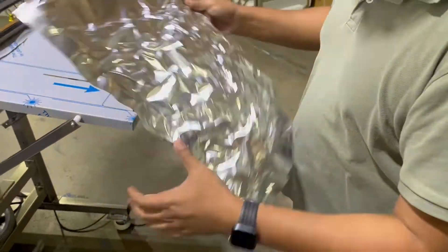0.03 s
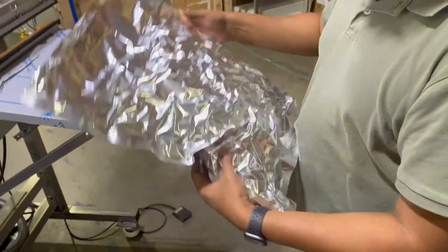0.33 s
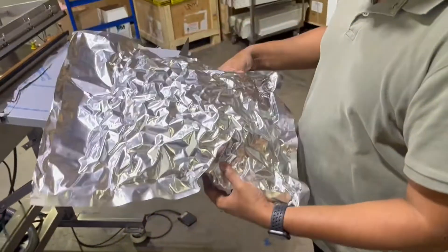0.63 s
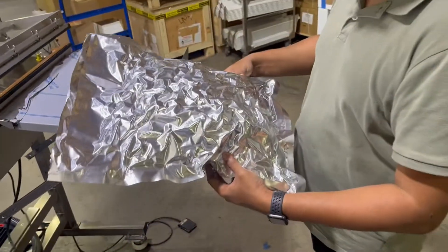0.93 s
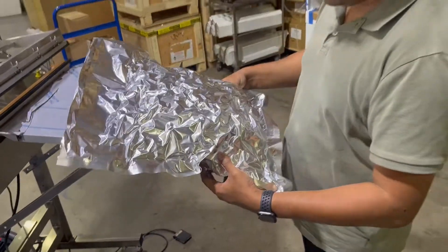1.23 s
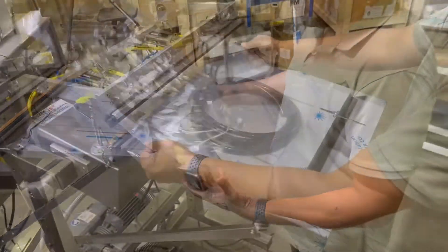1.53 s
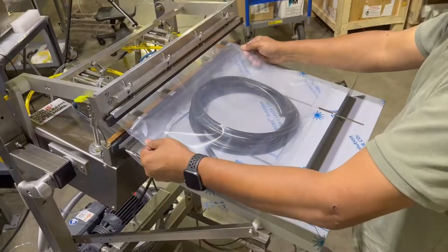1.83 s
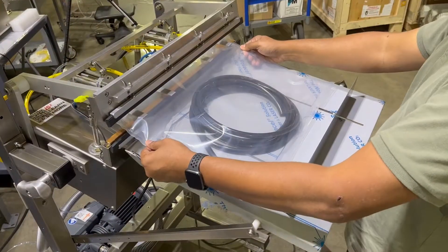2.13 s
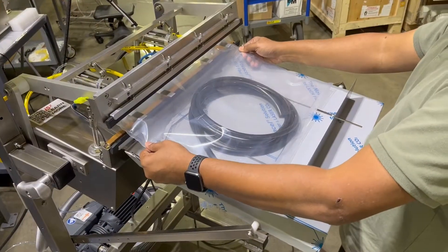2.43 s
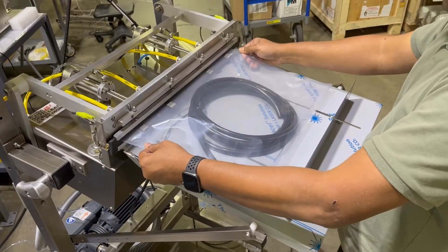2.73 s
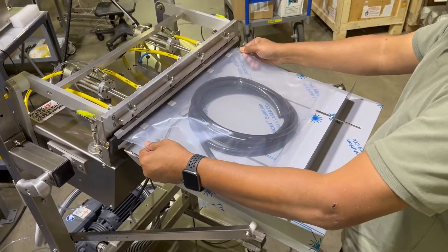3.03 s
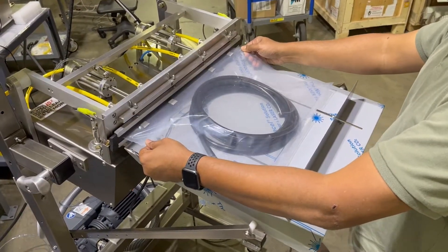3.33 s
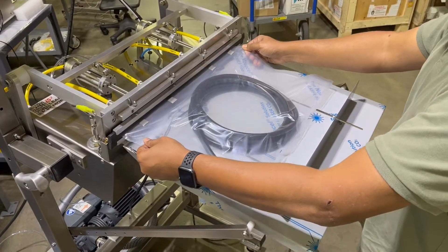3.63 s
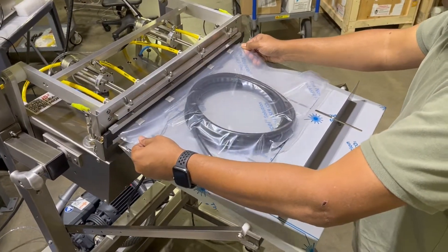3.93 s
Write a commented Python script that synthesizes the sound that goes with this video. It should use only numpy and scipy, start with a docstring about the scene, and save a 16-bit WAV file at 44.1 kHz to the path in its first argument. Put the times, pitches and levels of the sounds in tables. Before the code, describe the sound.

A foil bag crinkles, snaps and flexes close to the microphone, followed by rustling plastic. A vacuum sealer's motor then hums up, air rushes in, the jaw clacks shut and the pump whines over low workshop rumble.

```python
"""Foil bag and vacuum sealer

A crumpled foil bag is handled in a workshop: creases snap, dents pop and the sheet flexes with
falling low tones. A plastic bag is then laid in a vacuum sealer. The motor hums up, air rushes
into the nozzle, the jaw shuts with a clack and the vane pump settles into a whine."""
import sys
import numpy as np
from scipy import signal
from scipy.fft import rfft, irfft, next_fast_len
from scipy.io import wavfile

SR = 44100
rng = np.random.default_rng(int(sys.argv[2]) if len(sys.argv) > 2 else 0)


def wrap_up_sound(samples):
    """Save the sound to the file named by the first command line argument, as 16-bit audio."""
    columns = np.atleast_2d(samples).T
    # keep every value between -1 and 1, then stretch to whole-number steps
    tamed = np.clip(columns, -1, 1)
    steps = np.round(tamed * 32767).astype(np.int16)
    wavfile.write(sys.argv[1], SR, steps)


N = 176400
T = np.arange(N) / SR


def amp(db):
    """Decibels to gain."""
    return 10 ** (np.asarray(db) / 20)


def unit(x):
    """Scales to rms 1."""
    return x / np.sqrt(np.mean(x ** 2) + 1e-20)


def read(points, hz):
    """Reads a curve on a log-frequency axis."""
    freqs, values = np.transpose(points)
    return np.interp(np.log(hz + 1), np.log(freqs + 1), values)


def fader(rows, column=1):
    """Gain from a dB column, silent outside its rows; a curve ending after 3.5 s holds its level."""
    rows = np.array(rows)
    end_db = rows[-1, column] if rows[-1, 0] > 3.5 else -120
    return amp(np.interp(T, rows[:, 0], rows[:, column], left=-120, right=end_db))


def add(mix, start, sound):
    """Mixes a sound in at a start time in seconds."""
    part = mix[..., max(round(start * SR), 0):][..., :sound.shape[-1]]
    part += sound[..., :part.shape[-1]]


def colour(x, eq):
    """Minimum-phase EQ: nothing rings ahead of a transient."""
    size = next_fast_len(x.shape[-1] + 4096)
    log_gain = np.log(amp(read(eq, abs(np.fft.fftfreq(size, 1 / SR)))))
    response = np.exp(np.conj(signal.hilbert(log_gain)))[:size // 2 + 1]
    return irfft(rfft(x, size) * response, size)[..., :x.shape[-1]]


def stereo(pair):
    """Blends two unrelated signals into a partly alike microphone pair."""
    # stereo image (frequency [Hz], left-right likeness [0-1])
    image = [(50,0.98),(300,1),(800,0.97),(1100,0.93),(1500,0.21),(1900,1),(3000,0.7),(4800,0.5),(7000,0.99),(8500,1),(15000,1)]
    size = pair.shape[1]
    likeness = read(image, np.fft.rfftfreq(size, 1 / SR))
    mid = rfft(pair[0]) * np.sqrt((1 + likeness) / 2)
    side = rfft(pair[1]) * np.sqrt((1 - likeness) / 2)
    return irfft(np.array([mid + side, mid - side]), size)


def noise(size=N):
    """Two unrelated white noises."""
    return rng.standard_normal((2, size))


def band(hz, width, size=N):
    """Stereo noise through one resonance, rms 1."""
    detune = (np.fft.rfftfreq(size, 1 / SR) - hz) / (width / 2)
    return unit(stereo(irfft(rfft(noise(size)) / (1 + detune ** 2), size)))


def wander(hz):
    """Random modulation up to about hz, rms 1."""
    lowpass = np.exp(-(np.fft.rfftfreq(N, 1 / SR) / hz) ** 2)
    return unit(irfft(rfft(rng.standard_normal(N)) * lowpass, N))


def echoes(x, spread_s=0.012, echo_db=-10.5):
    """Near reflections off the table and the machine comb the sound."""
    out = x.copy()
    for delay, sign in zip(rng.uniform(0.0005, spread_s, size=5), rng.choice([-1, 1], size=5)):
        add(out, delay, sign * amp(echo_db) * np.exp(-delay / spread_s) * x)
    return out


def room(x, wet_db):
    """Adds the workshop's reverb tail, each band dying at its own speed."""
    # reverb time (frequency [Hz], T60 [s])
    t60 = [(100,0.098),(500,0.64),(2000,0.81),(6000,0.55),(14000,0.18)]
    reflections = noise(SR) * (rng.random((2, SR)) < 0.08) * (T[:SR] > 0.003)
    hz, t, bands = signal.stft(reflections, SR, nperseg=256)
    tail = signal.istft(bands * amp(-60 * t / read(t60, hz)[:, None]), SR, nperseg=256)[1]
    return x + amp(wet_db) * signal.fftconvolve(x, tail / np.linalg.norm(tail[0]), axes=1)[:, :N]


def workshop():
    """Room tone: ventilation rumble and distant machines."""
    # ventilation (frequency [Hz], gain [dB])
    vent_eq = [(20,-13.5),(38,-11),(58,-7.5),(85,-2.5),(125,-8.5),(200,-17.5),(300,-23),(500,-29),(1000,-35.5),(2000,-50),(4000,-47),(7000,-62.5),(12500,-47.5),(15000,-56)]
    # machine drones (centre [Hz], width [Hz], level [dB])
    drones = [(55.7,7.2,-52.5),(118.6,2.8,-58.5),(564.3,3.6,-82.5),(1103,30,-79)]
    ventilation = amp(-53) * unit(colour(stereo(noise()), vent_eq))
    return ventilation + sum(amp(db) * band(hz, width) for hz, width, db in drones)


def pump(hum_hz=119.8, vane_hz=172.65, vane_roughness=0.42):
    """The motor shudders up to a hum; the passing vanes whine and puff out exhaust as the load grows."""
    # motor hum (time [s], level [dB])
    hum_fade = [(2.75, -55), (2.766, -52.5), (3.0, -34.5), (3.104, -35), (3.152, -42), (3.582, -45.5),
                (3.634, -44), (4.0, -45)]
    # hum partials (harmonic [n], gain [dB])
    hum_partials = [(1,2),(2,-19.5),(3,-33)]
    # whine partials (harmonic [n], level [dB])
    vane_partials = [(1,-48.5),(3,-55.5),(4,-52),(5,-56.5),(6,-51.5),(8,-51),(11,-62),(12,-48.5),(13,-52.5),(14,-56.5),(15,-68),(17,-55.5),(20,-56.5),(24,-65),(25,-64),(37,-53)]
    # whine swelling under load (time [s], gain [dB])
    load_fade = [(3.0,-38),(3.25,-11.5),(3.5,-0.5),(3.75,3),(4,2)]
    # exhaust hiss (time [s], level [dB])
    exhaust_fade = [(3.3,-60),(3.7,-52),(4,-44.5)]
    # run-up rumble (time [s], level [dB])
    shudder_fade = [(2.78,-56),(2.92,-42.5),(3.03,-60)]
    motor_phase = 2 * np.pi * np.cumsum(hum_hz * (1 + 0.0008 * wander(12))) / SR
    hum = fader(hum_fade) * sum(amp(db) * np.sin(k * motor_phase) for k, db in hum_partials)
    vane_phase = 2 * np.pi * np.cumsum(vane_hz * (1 + 0.00114 * wander(9.4))) / SR
    whine = np.zeros((2, N))
    for k, db in vane_partials:
        # upper partials spread wider in stereo
        offset = rng.uniform(0, 2 * np.pi) + rng.standard_normal((2, 1)) * min(k / 4, 1)
        whine += amp(db) * (1 + vane_roughness * wander(35)) * np.sin(k * vane_phase + offset)
    puffs = 1 + 0.7 * np.cos(vane_phase)
    exhaust = fader(exhaust_fade) * unit(band(hz=2230, width=250) * puffs)
    shudder = fader(shudder_fade) * band(hz=171, width=240)
    return np.sqrt(2) * (hum + fader(load_fade) * whine) + exhaust + shudder


def air(flutter_db=0.94):
    """Air hisses through the nozzle, whistling faintly, and dulls as the bag empties."""
    # suction (time [s], body level [dB], treble level [dB])
    suction = [(2.86,-63,-78),(2.95,-52.5,-48.5),(3.03,-42.5,-40.5),(3.1,-35.5,-36.5),(3.2,-35,-36.5),(3.36,-37,-35),(3.5,-38,-37),(3.75,-37.5,-40),(4,-38.5,-41.5)]
    # body of the rush (frequency [Hz], gain [dB])
    body_eq = [(60,-27.5),(130,-10.5),(250,-8),(450,-16),(650,-9.5),(1000,-12),(1500,-10),(1800,-6.5),(2300,-14.5),(2700,-13),(4000,-12.5),(6600,-18.5),(8000,-25.5),(11000,-62)]
    # treble hiss (frequency [Hz], gain [dB])
    treble_eq = [(50,-59),(2500,-15.5),(4000,-9),(6500,-4),(9000,2),(10500,4.5),(13000,7),(14300,1),(16000,-4.5)]
    # nozzle whistles (pitch [Hz], width [Hz], level [dB])
    whistles = [(1210,14,-47),(1480,9.8,-46),(1860,110,-58)]
    # whistle swells (time [s], gain [dB])
    swells = [(3.05,-42),(3.15,4),(3.35,-23),(3.55,-5),(4,-28)]
    rush = np.zeros((2, N))
    for column, eq in enumerate((body_eq, treble_eq), start=1):
        hiss = unit(colour(echoes(stereo(noise())), eq))
        rush += hiss * amp(flutter_db * wander(hz=40)) * fader(suction, column)
    return rush + fader(swells) * sum(amp(db) * band(hz, width) for hz, width, db in whistles)


def crinkles(per_second=1500, spread_db=3.5):
    """A dense spray of tiny crease clicks, a few of them large, over a wash of noise."""
    sizes = amp(spread_db * np.minimum(rng.exponential(1, N), 4))
    clicks = sizes * (rng.random(N) < per_second / SR) * noise()
    return echoes(stereo(unit(clicks) + 1.01 * noise()))


def rustle(body_db=-1, treble_db=4.5):
    """The bags crinkle as they are moved, and the film rubs on the sealer."""
    # three gestures (time [s], body level [dB], treble level [dB])
    foil_handled = [(0.0, -47.5, -63.5), (0.028, -34, -43.5), (0.07, -50.5, -58), (0.112, -41, -67),
                    (0.128, -45, -63), (0.138, -56.5, -67), (0.21, -55.5, -67), (0.256, -48, -59.5),
                    (0.336, -48, -66), (0.348, -39.5, -53), (0.366, -53.5, -65.5), (0.436, -46, -60.5),
                    (0.476, -60, -73), (0.518, -29.5, -41), (0.536, -47, -62), (0.548, -34.5, -56),
                    (0.558, -47, -61), (0.645, -60, -73)]
    bag_slid = [(1.25, -87, -90), (1.326, -58, -69.5), (1.34, -51.5, -80), (1.372, -59, -83),
                (1.386, -51, -72), (1.398, -48, -73), (1.478, -57.5, -68), (1.506, -43, -73),
                (1.532, -48, -63), (1.544, -44.5, -63), (1.568, -54.5, -74), (1.588, -54, -71),
                (1.602, -57.5, -78), (1.802, -78, -80), (1.884, -57.5, -75.5), (2.152, -80, -85.5),
                (2.3, -104, -85)]
    film_laid = [(2.35, -89, -99), (2.383, -46, -59.5), (2.42, -56, -67), (2.44, -50, -48),
                 (2.448, -41, -57), (2.494, -49, -60), (2.592, -53.5, -74), (2.638, -43, -45.5),
                 (2.67, -48.5, -60), (2.687, -36, -49.5), (2.77, -52, -65.5), (2.791, -35.5, -59),
                 (2.81, -45, -69), (2.848, -43, -65), (2.874, -46.5, -68.5), (2.96, -50.5, -57)]
    # body and treble sizzle of the crinkle (frequency [Hz], gain [dB])
    body_eq = [(50,-18.5),(150,4),(300,1),(600,0.5),(1100,-1.5),(1500,-3),(1900,-4),(3000,-9),(4500,-11.5),(7000,-22.5),(16000,-65)]
    treble_eq = [(50,-74),(2000,-25),(4500,-1.5),(6800,-2),(9000,-3.5),(11000,1.5),(14000,-4),(16000,-15)]
    # bag rubs and one faint brief hum (time [s], length [s], centre [Hz], width [Hz], level [dB])
    rubs = [(1.391,.04,1300,1300,-49),(1.501,0.049,1330,1300,-44),(2.051,0.24,563,9.1,-67),(2.372,0.061,1150,430,-46),(2.631,0.038,1920,330,-41.5),(2.823,0.074,2200,650,-36.5),(2.83,0.043,3700,3000,-49.5),(2.841,0.14,1300,540,-42)]
    grains, moves = crinkles(), (foil_handled, bag_slid, film_laid)
    out = amp(body_db) * unit(colour(grains, body_eq)) * sum(fader(m, column=1) for m in moves)
    out += amp(treble_db) * unit(colour(grains, treble_eq)) * sum(fader(m, column=2) for m in moves)
    for start, length, hz, width, db in rubs:
        progress = np.arange(0, length, 1 / SR) / length
        stroke = np.sin(np.pi * progress ** 0.4)
        add(out, start, amp(db) * stroke * band(hz, width, size=16384)[:, :len(stroke)])
    return room(out, wet_db=-14.5)


def flexes(roughness=0.27):
    """The sheet wobbles in a tone that falls as its tension lets go; the film squeaks under the jaw."""
    # glides (time [s], length [s], from [Hz], to [Hz], level [dB], peak at [0-1], rolloff [dB/octave])
    wobbles = [(.355,0.044,302,173,-40.5,0.47,-12),(0.52,0.022,355,148,-22.5,0,-12),(.543,0.0075,900,370,-29,0.9,-15),(0.55,0.027,134,51.7,-28,.25,-14),
               (1.07,0.17,155.5,84.8,-35,.93,-12.5),(2.447,.03,481,199,-34.5,0,-17),(2.699,0.023,347,117,-32,1,-15),(2.742,0.022,150,95,-35,.6,-17),
               (2.79,0.018,249,146,-31,0.4,-10.5),(2.816,0.07,217,186,-41.5,0.1,-17),(2.899,0.02,262,131,-36.5,0.2,-10),(2.925,0.021,255,132,-35.5,0.6,-13)]
    squeaks = [(3.1,.021,1240,1135,-27,0.3,-16),(3.126,0.022,1097,1255,-34,.75,-18)]
    out = np.zeros((2, N))
    for start, length, from_hz, to_hz, db, peak, rolloff in wobbles + squeaks:
        progress = np.arange(0, length, 1 / SR) / length
        phase = 2 * np.pi * np.cumsum(from_hz * (to_hz / from_hz) ** progress) / SR
        tone = sum(amp(rolloff * np.log2(k)) * np.sin(k * phase) for k in range(1, 5))
        swell = np.interp(progress, [0, np.clip(peak, 0.05, 0.95), 1], [0, 1, 0]) ** 0.5
        add(out, start, amp(db) * swell * tone)
    return room(out * (1 + roughness * wander(130)), wet_db=-14)


def snaps(attack_s=0.0004, crack_decay_s=0.0015, shiver_decay_s=0.018, trim_db=-3.5):
    """Each crease gives way with a sharp crack, and the sheet shivers after it."""
    # crease snaps (time [s], level [dB], bass [dB], treble [dB])
    creases = [(0.022, -33, -5, -7), (0.028, -36, -8, 4), (0.08, -32.5, -6, -14), (0.106, -23, -10.5, -10),
               (0.108, -28, -6, -12), (0.1232, -21, -18, -10.5), (0.13, -32, -25, -10),
               (0.259, -32.5, -2, -31), (0.347, -25, -35, -13.5), (0.352, -27.5, 4, -41),
               (0.426, -43, 3, -4), (0.4925, -41.5, -12, 4), (0.515, -26, -5, -3.5), (0.662, -21, -16, -19),
               (1.215, -25.5, -15, -25.5), (1.234, -43, 10, -13), (1.382, -33, -23, -12),
               (1.386, -31.5, -32, -1), (1.403, -29.5, -32, -39), (1.503, -27, -32, -25),
               (1.545, -31, -28, -8), (1.584, -34, -47, -13), (1.704, -50, -11, -9), (1.886, -45, -23, -26),
               (1.903, -35.5, -27, -28), (1.993, -39.5, -22, -21.5), (2.378, -27.5, -30, -24),
               (2.435, -33.5, -14, -5.5), (2.449, -28.5, 11.5, -19), (2.63, -30, -18, 1),
               (2.683, -26, -14, -16), (2.697, -21, -4, -13.5), (2.712, -26, -6, -21),
               (2.782, -32, -25, -18), (2.997, -25, -18, -15), (3.969, -21, -20, -5)]
    flat_bass_db, flat_treble_db = -13.5, -16  # the values that give no tilt
    # tone of the crack (frequency [Hz], gain [dB])
    crack_eq = [(60,-40),(200,9),(500,-2),(1000,2.5),(1500,-4),(1900,1.5),(3500,-5.5),(7000,-10),(11000,-11.5),(16000,-13)]
    # the shiver is duller than the crack (frequency [Hz], gain [dB])
    shiver_eq = [(1500,0.5),(11000,-7)]
    out, t = np.zeros((2, N)), T[:4096]
    attack = np.minimum(t / attack_s, 1)
    for start, db, bass_db, treble_db in creases:
        burst = unit(colour(stereo(noise(len(t))), crack_eq)) * attack
        crack = burst * np.exp(-t / crack_decay_s)
        shiver = amp(-20.5) * colour(burst, shiver_eq) * np.exp(-t / shiver_decay_s)
        tilt = [(300, bass_db - flat_bass_db), (900, 0.0075), (2500, 0),
                (8000, treble_db - flat_treble_db)]
        add(out, start, amp(db + trim_db) * colour(crack + shiver, tilt))
    return room(out, wet_db=-13)


def pops():
    """Dents in the foil pop and ring briefly."""
    # dents (time [s], level [dB], pitch [Hz], width [Hz], ring time [s])
    dents = [(.092,-41,1750,600,0.0084),(.346,-40.5,2960,590,0.01),(.487,-43.5,910,487,0.0066),(.543,-34,820,597,0.0045),(.6615,-28.5,1010,1100,0.0024),(1.063,-59.5,5850,1530,0.0038),(1.082,-50,2650,1830,0.0056),(1.099,-41.5,3870,710,0.0027),(1.1,-39.5,1650,606,0.0028),(1.119,-48,3800,2500,0.00099),(1.213,-36,920,400,0.0057),(1.386,-43,6300,900,0.0023),(1.584,-43,2000,2000,0.0017),(1.677,-52.5,1790,2020,0.0027),(2.379,-53.5,3230,402,0.044),(2.45,-42,2200,800,0.012)]
    out, t = np.zeros((2, N)), T[:4096]
    for start, db, hz, width, ring_s in dents:
        envelope = 2 * t / ring_s * np.exp(1 - 2 * t / ring_s)
        ring = unit(band(hz, width, size=len(t)) * envelope)
        add(out, start, amp(db) * ring * np.sqrt(np.mean(envelope ** 2)))
    return room(out, wet_db=-14)


def jaw(pitch_sag=0.38, attack_s=0.00043):
    """Dead knocks of the padded jaw: a tick and a few cycles that sag in pitch."""
    # knocks (time [s], level [dB], starting pitch [Hz], decay [s], relative tick level [dB])
    knocks = [(3.1600,-3.5,1990,0.00037,-6),(3.1606,-19.5,696,0.00096,-13),(3.2496,-16.5,750,0.00075,-26),(3.359,-22.5,1470,0.0015,-2),(3.365,-26.5,433,0.0016,-27)]
    out, t = np.zeros((2, N)), T[:2048]
    for start, db, hz, decay, tick_db in knocks:
        pitch = hz * (1 - pitch_sag * (1 - np.exp(-t / (2 * decay))))
        fade = np.exp(-t / decay)
        envelope = (1 - np.exp(-(t / attack_s) ** 2)) * fade
        thud = envelope / envelope.max() * np.sin(2 * np.pi * np.cumsum(pitch) / SR)
        tick = amp(tick_db) * stereo(noise(len(t))) * fade
        add(out, start, amp(db) * (thud + tick))
    return room(out, wet_db=-16.5)


def scene():
    """Room tone, bags and sealer in one stereo mix."""
    return workshop() + snaps() + pops() + flexes() + rustle() + jaw() + pump() + air()


def record(dry, cutoff_hz=15750):
    """The two microphone ports differ in level and phase, colour the sound and limit its top end."""
    # balance (frequency [Hz], left over right [dB])
    balance = [(300,1.25),(650,2.5),(1500,0.5),(2100,2),(4500,4),(6800,1.5),(8000,0)]
    # phase between the ports (frequency [Hz], left lead [rad])
    left_lead = [(50,0),(1100,.5),(1450,2.5),(1800,0),(3500,0.71),(5100,1),(5700,-1.3),(6600,-1.37),(8000,-3),(10000,-4.5),(11200,-7.5),(12900,-8.5),(15000,-8)]
    # microphone response (frequency [Hz], gain [dB])
    mic_eq = [(20,2),(5000,-2),(7000,-1),(7600,2),(8100,-8.5),(8650,-9),(9200,3),(10500,-6),(12000,-6),(14300,-4),(15300,-15),(16000,-12)]
    hz = np.fft.rfftfreq(2 * N, 1 / SR)
    left = amp(read(balance, hz) / 2)
    right = np.exp(-1j * read(left_lead, hz)) / left
    pair = irfft(rfft(dry, 2 * N) * np.array([left, right]))[:, :N]
    lowpass = signal.firwin(511, cutoff_hz, window=("kaiser", 9), fs=SR)
    return signal.oaconvolve(colour(pair, mic_eq), lowpass[None], "same")


dry = scene()
out = record(dry)
wrap_up_sound(out)
```